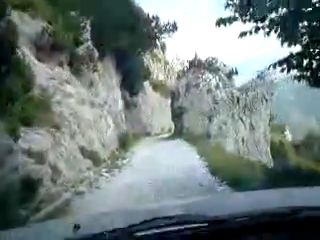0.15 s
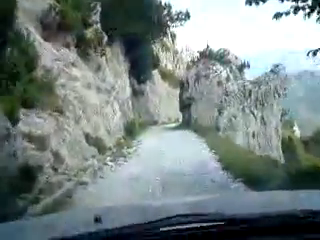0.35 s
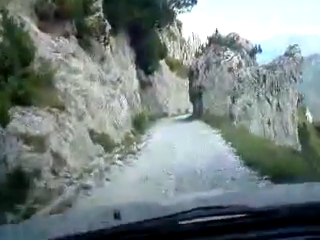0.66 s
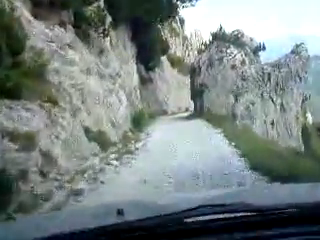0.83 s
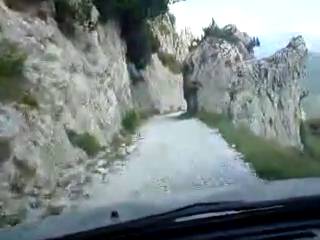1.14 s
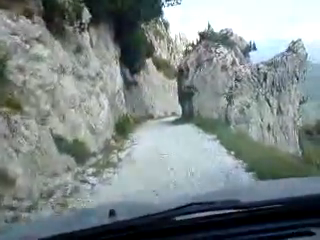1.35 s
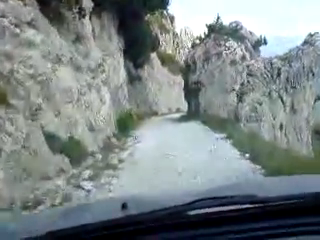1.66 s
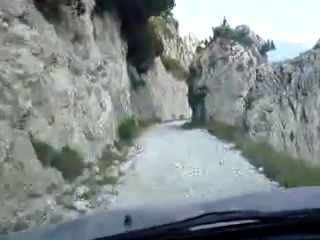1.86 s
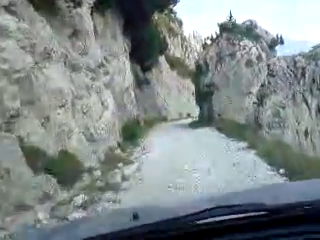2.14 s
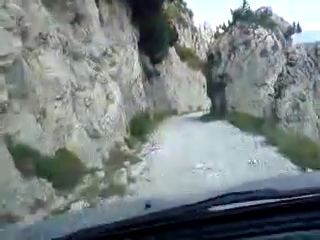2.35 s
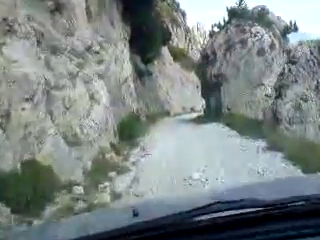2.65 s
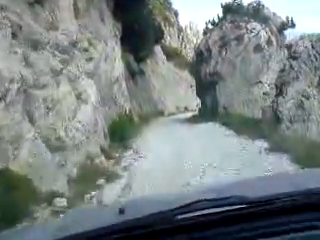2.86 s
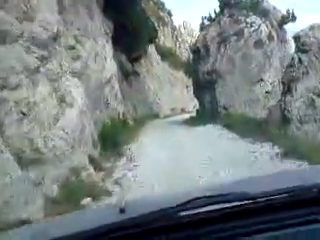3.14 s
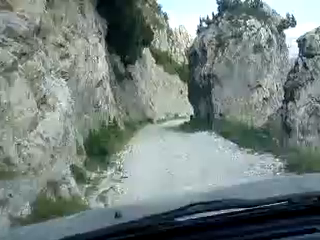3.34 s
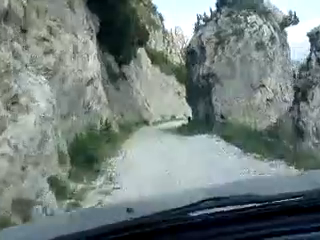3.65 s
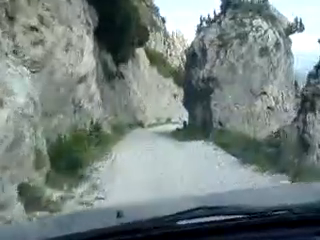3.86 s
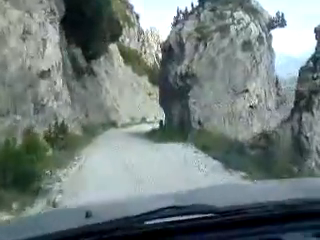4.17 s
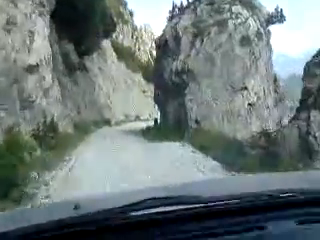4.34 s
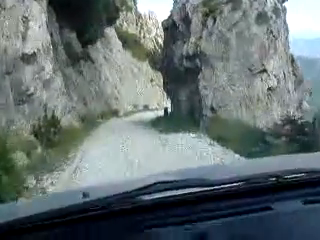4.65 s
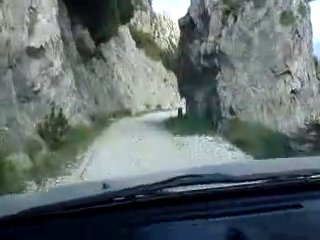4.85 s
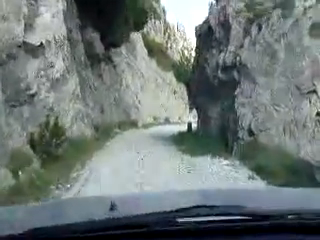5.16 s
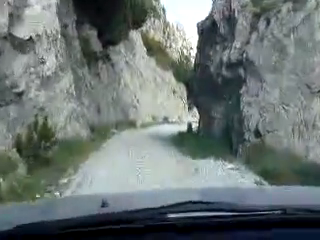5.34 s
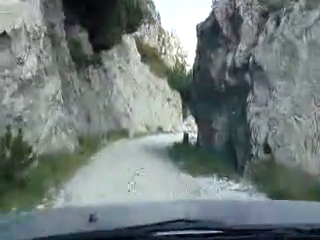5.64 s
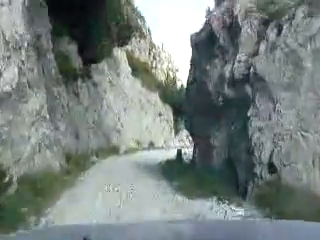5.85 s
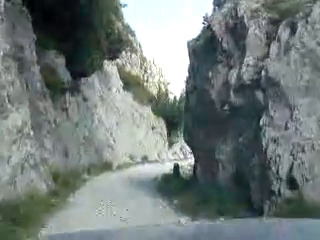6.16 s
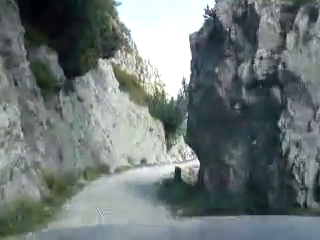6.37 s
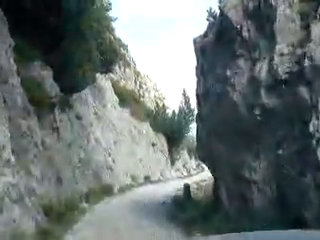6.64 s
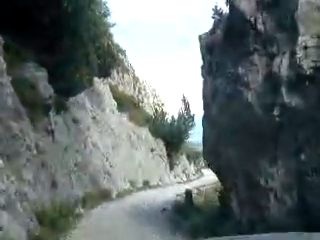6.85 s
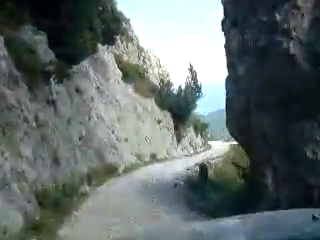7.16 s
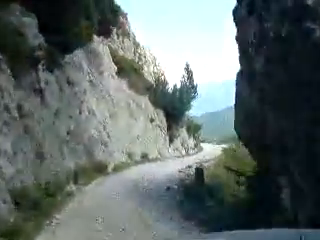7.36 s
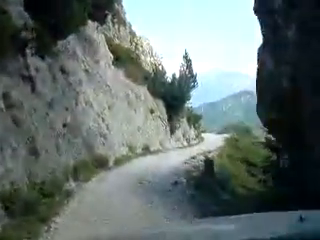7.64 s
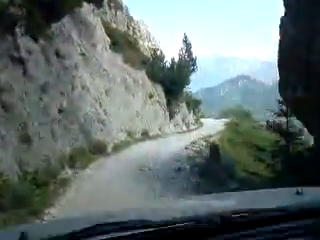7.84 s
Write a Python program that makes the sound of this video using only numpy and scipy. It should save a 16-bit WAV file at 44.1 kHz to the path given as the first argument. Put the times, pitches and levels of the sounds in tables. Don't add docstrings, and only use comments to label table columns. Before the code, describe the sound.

Low, boomy car cabin on a rough stony road: steady engine hum, grinding gravel, dull stone knocks, soft suspension thumps and small trim ticks.

```python
import sys
import numpy as np
from scipy import signal
from scipy.fft import rfft, irfft, next_fast_len
from scipy.io import wavfile
from scipy.ndimage import uniform_filter1d, map_coordinates

SR = 44100
rng = np.random.default_rng(int(sys.argv[2]) if len(sys.argv) > 2 else 0)


def transcribe(signal):
    frames = np.atleast_2d(signal).T
    limited = np.clip(frames, -1, 1)
    pcm = np.round(limited * 32767).astype(np.int16)
    wavfile.write(sys.argv[1], SR, pcm)


def level_to_linear(level):
    exponent = np.asarray(level, float) / 20
    return 10 ** exponent


N = 352800

# (time [s], looseness [dB])
LOOSENESS = [(0.0, 2), (0.4, 0), (0.96, 1.5), (1.3, 0), (2.16, -0.5), (2.76, 1), (3.03, 0), (3.76, -0.5),
             (4.17, 3), (4.4, -2), (4.8, 1.1), (5.12, 5), (5.7, 2), (6.6, 0.6), (6.9, 3), (7.35, 4.5),
             (7.72, 5), (8.0, 3.5)]
# (time [s], jolt [dB], length [s])
WHEEL_JOLTS = [(0.01, 14, 0.017), (0.23, 4.5, 0.14), (0.49, 2, 0.39), (1.11, 6.5, 0.096), (1.49, 3.5, 0.17),
               (1.7, 2.5, 0.29), (2.0, -2, 0.073), (2.77, 5, 0.13), (2.94, 1, 0.11), (3.08, 1, 0.16),
               (3.25, 3, 0.16), (3.55, 0.5, 0.26), (3.83, 3.5, 0.092), (4.02, 5, 0.11), (4.34, 11, 0.061),
               (4.84, 1.5, 0.14), (5.17, 2.5, .15), (5.44, 2, 0.39), (5.6, 2.5, 0.19), (6.04, 2, 0.5),
               (6.66, 2, 0.066), (7.1, -5, .1), (7.27, 2.5, 0.1), (7.48, 8, 0.15), (7.59, 7, 0.12),
               (7.8, 1, 0.1), (7.93, 4, 0.12)]


def unit(x):
    return x / np.sqrt(np.mean(x ** 2) + 1e-20)


def curves(rows):
    s, *cols = np.transpose(rows)
    return [np.interp(np.arange(N) / SR, s, c) for c in cols]


def swells(rows):
    t = np.arange(0, N + 64, 64) / SR
    humps = sum(db * np.exp(-(2 * (t - s) / length) ** 2) for s, db, length in rows)
    return np.interp(np.arange(N) / SR, t, humps)


def wobble(rate):
    knots = rng.standard_normal(int(N * rate / SR) + 4)
    return map_coordinates(knots, [np.arange(N) * rate / SR])


def coloured(x, spectrum):
    m = next_fast_len(N + 8192)
    hz, db = np.transpose(spectrum)
    log_hz = np.log(np.fft.rfftfreq(m, 1 / SR) + 1)
    gain = level_to_linear(np.interp(log_hz, np.log(hz + 1), db, left=-120, right=-120))
    return unit(irfft(rfft(x, m) * gain, m)[:N])


def gritty(patchy_db, per_s, spread_db, share):
    z = signal.stft(rng.standard_normal(N + 512), nperseg=512)[2]
    field = uniform_filter1d(rng.standard_normal(z.shape), size=6, axis=0)
    field = uniform_filter1d(field, size=6, axis=1)
    hiss = signal.istft(z * level_to_linear(patchy_db * unit(field)), nperseg=512)[1][:N]
    chance, size, sign = rng.random(N), rng.exponential(size=N), rng.standard_normal(N)
    cracks = (chance < per_s / SR) * sign * level_to_linear(spread_db * np.minimum(size, 4))
    return np.sqrt(1 - share) * unit(hiss) + np.sqrt(share) * unit(cracks)


def resonant(x, hz, q):
    y = signal.lfilter(*signal.iirpeak(hz, max(q, .3), SR), x)
    return y / np.abs(y).max()


def add(track, s, x):
    track[round(s * SR):][:len(x)] += x


def engine():
    # (time [s], firing rate [Hz], drone level [dB])
    revs = [(0.0, 46.47, -16.5), (0.4, 46.93, -17), (0.8, 46.88, -17.5), (1.2, 48.24, -18.5),
            (1.6, 50.33, -14.5), (2.1, 50.57, -16.5), (3.1, 51.15, -16), (3.7, 50.7, -17.5),
            (4.0, 49.52, -16), (4.4, 49.18, -18), (5.2, 46.73, -16.5), (5.6, 46.7, -19.5),
            (6.0, 47.5, -14.5), (6.4, 47.98, -16), (6.8, 47, -16), (7.2, 46.15, -18), (8.0, 45.28, -19)]
    # (multiple of firing rate, level under the drone [dB])
    orders = [(2, -23), (3, -36), (3.8, -32), (5, -43), (6, -50)]
    teeth = (7.6, 9.57)
    coasting = (-50, -56)
    # (time [s], swell [dB], length [s])
    gear_loads = [
        [(0.12, 7, 0.25), (0.62, 4, 0.34), (1.0, 12.5, 0.24), (1.55, 11.5, 0.25), (2.05, 6, 0.15), (2.75, 3.5, 0.075), (3.0, 7.5, 0.35), (3.4, 9.5, 0.22), (3.68, 8.5, 0.17), (4.58, 9.5, 0.35), (4.95, 6.5, .35), (5.3, 7, 0.41), (5.7, 5.5, 0.32), (6.02, 7, 0.19), (6.35, 5.5, 0.41), (6.85, 9.5, 0.36), (7.1, 5, 0.087)],
        [(0.5, 9, 0.34), (1.0, 13.5, 0.36), (1.6, 4.5, 0.35), (2.65, 10.5, 0.22), (3.0, 8, .2), (3.2, 8.5, .1), (3.42, 12, 0.12), (3.9, 10, 0.32), (4.85, 10.5, 0.23), (5.3, 14, .2), (5.75, 14, 0.37), (6.03, 10, 0.13), (6.3, 15.5, 0.16), (6.85, 6, .12), (7.3, 13, 0.15)],
    ]

    hz, drone_db = curves(revs)
    turn = 2 * np.pi * np.cumsum(hz) / SR
    drone = np.sin(turn - 1.3)
    for k, db in orders:
        drone += level_to_linear(db + 4.4 * wobble(5.1)) * np.sin(k * turn + k)
    whine = np.zeros(N)
    for k, db, rows in zip(teeth, coasting, gear_loads):
        whine_db = db + swells(rows) + 0.87 * wobble(18)
        whine += level_to_linear(whine_db) * np.sin(k * turn + 1.1 * wobble(15))
    unsteady_db = 1.22 * wobble(8) + 1.6 * wobble(25)
    return np.sqrt(2) * (level_to_linear(drone_db + unsteady_db) * drone + whine)


def road():
    # (time [s], swell [dB], length [s])
    heaves = [(0.11, 11.5, 0.14), (0.33, 12, 0.25), (.55, 5.5, 0.22), (.9, 3.5, .3), (1.2, 13.5, 0.19),
              (1.42, 5, 0.18), (1.85, 4.5, 0.18), (2.15, 12.5, 0.35), (2.45, 3.5, 0.18), (2.7, 3, .2),
              (3.05, 6.5, 0.25), (3.35, 13, 0.33), (3.62, 9, 0.17), (3.85, 11, 0.12), (4.02, 13.5, 0.15),
              (4.35, -8, .1), (4.52, 8.5, 0.15), (4.9, 7, 0.15), (5.1, 5, 0.13), (5.3, 9.5, 0.24),
              (5.5, 9.5, 0.24), (5.75, 9, 0.18), (6.0, 7, .15), (6.25, 9, 0.33), (6.45, 6.5, 0.19),
              (6.72, 10, 0.1), (7.0, 13.5, 0.38), (7.43, 10, 0.11), (7.58, 15, 0.14), (7.93, 12, 0.12)]
    # (frequency [Hz], density [dB per Hz])
    boom_spectrum = [(4, -29), (14, -19.5), (24, -2), (38, -1.5), (56, -1), (63, -7.5), (80, -6.5),
                     (140, -58)]
    # (frequency [Hz], density [dB per Hz])
    roar_spectrum = [(53, -29.5), (90, -8), (97, -4), (225, -17.5), (311, -19), (360, -21.5), (411, -22),
                     (520, -29.5), (680, -57), (1140, -120)]

    heave_db = swells(heaves)
    boom = level_to_linear(-26 + 0.27 * heave_db) * coloured(rng.standard_normal(N), boom_spectrum)
    shell_hz, wander_rad = 25.9, 1.5
    shell_phase = 2 * np.pi * shell_hz * np.arange(N) / SR + wander_rad * wobble(7.6)
    shell = np.sqrt(2) * level_to_linear(-30 + heave_db) * np.sin(shell_phase)
    roar_db = -36 + 0.4 * curves(LOOSENESS)[0] + swells(WHEEL_JOLTS)
    lumps = level_to_linear(0.34 * wobble(20))
    roar = unit(lumps * coloured(gritty(0.98, 300, 2.1, 0.092), roar_spectrum))
    return boom + shell + level_to_linear(roar_db) * roar


def gravel():
    # (frequency [Hz], density [dB per Hz])
    pan_spectrum = [(240, -30), (400, -1.5), (456, -5), (648, -1.5), (719, -6.5), (842, -3), (1040, -11),
                    (1400, -18.5), (1820, -45.5), (3080, -120)]
    # (frequency [Hz], density [dB per Hz])
    crunch_spectrum = [(650, -15.5), (1100, -2), (1370, 0), (1580, -1), (2030, 0), (2200, -2.5), (3090, -9),
                       (3800, -19.5), (4940, -38), (8360, -120)]
    # (frequency [Hz], density [dB per Hz])
    grit_spectrum = [(1880, -25.5), (3200, -4), (3800, -1.5), (5150, -6), (6630, -11.5), (6980, -16),
                     (7300, -23.5), (9490, -57), (16100, -120)]

    loose_db, jolt_db = curves(LOOSENESS)[0], swells(WHEEL_JOLTS)
    bite = wobble(24)
    pan_db = -46.5 + loose_db + 0.46 * jolt_db + 1.6 * bite
    crunch_db = -47.5 + 0.78 * loose_db + 0.11 * jolt_db + 1.1 * bite
    grit_db = -54.5 + 1.2 * loose_db + 0.11 * jolt_db + 0.9 * bite
    pan = level_to_linear(pan_db) * coloured(gritty(2.6, 350, 3.5, 0.23), pan_spectrum)
    crunch = level_to_linear(crunch_db) * coloured(gritty(1.8, 700, 3.5, 0.14), crunch_spectrum)
    grit = level_to_linear(grit_db) * coloured(gritty(2.4, 900, 1.7, 0.13), grit_spectrum)
    return pan + crunch + grit


def ticks():
    # (time [s], peak level [dB], ring [Hz], dull part [dB])
    trim = [(0.0392, -21.5, 3600, -13.5), (0.0473, -27, 2400, -23.5), (0.0497, -23, 5900, -5),
            (.052, -26, 3040, -15), (0.059, -30, 3600, -20), (.07, -30, 5000, -15),
            (0.083, -26.5, 4500, -4), (0.086, -21.5, 6100, -20), (.089, -31, 6300, -10),
            (0.1473, -30, 2520, -4), (0.151, -27.5, 2500, -7), (0.8637, -27, 4440, -7),
            (2.1358, -30.5, 3306, -10), (2.1718, -30, 3380, -15), (2.5998, -30, 4780, -12),
            (2.6908, -36, 5150, -12.5), (3.222, -25, 4760, -19), (3.2338, -35, 2420, -24),
            (3.2374, -27, 2804, -4), (3.333, -33.5, 2920, -8), (5.2408, -32, 3800, -13.5),
            (5.808, -43, 2467, 2), (7.2957, -23, 5630, -27), (7.7478, -27, 3380, -31),
            (7.992, -33, 2300, -8)]
    # (time [s], peak level [dB], ring [Hz], dull part [dB])
    crackle = [(0.672, -24, 1700, -1), (0.6738, -19.5, 6000, -8), (0.6743, -22, 3800, -3),
               (0.676, -25, 2000, 0), (0.68, -27, 2480, -2), (.682, -25, 2300, -3), (0.6833, -10, 5800, -8),
               (.6855, -26, 2300, -3), (0.6882, -12, 2690, -12), (0.6898, -12, 4500, -6),
               (0.692, -19, 2937, -7), (0.6933, -1, 2370, -7), (0.6958, -15.5, 1800, -6),
               (.696, -12, 5470, -9), (0.698, -24, 2600, -10), (.6995, -28, 3000, -6),
               (0.703, -25, 3400, -7), (0.705, -32, 2500, -5), (0.7096, -24, 2370, -5),
               (0.7105, -21.5, 4050, -12), (.712, -28, 2500, -7), (3.2675, -18.5, 6250, 1),
               (3.269, -22, 1810, -6)]

    out, t = np.zeros(N + SR), np.arange(SR // 20) / SR
    for rows, t60 in [(trim, 0.018), (crackle, 0.01)]:
        for s, db, hz, dull_db in rows:
            step = 3.5 * np.exp(-t / .00005)
            snap = level_to_linear(-60 * t / t60) * rng.standard_normal(len(t)) - step
            bright = resonant(snap, hz, 3.3) + 0.25 * resonant(snap, hz=6000, q=0.28)
            dull = level_to_linear(dull_db) * resonant(snap, hz=1680, q=0.53)
            add(out, s + 0.00043, level_to_linear(db - 2.5) * (bright + dull))
    return out[:N]


def knocks():
    # (time [s], peak level [dB], ring [Hz])
    stones = [(.178, -33, 523), (.796, -37, 673), (1.456, -32.5, 605), (1.688, -33, 795), (2.733, -31, 480),
              (3.185, -29, 550), (3.232, -32, 800), (3.49, -33, 750), (4.086, -35, 1044),
              (4.503, -35.5, 680), (5.106, -35, 703), (5.395, -31.5, 480), (5.659, -28, 460),
              (6.721, -28.5, 571), (6.878, -31, 612.4), (7.061, -28.5, 703), (7.098, -29, 705),
              (7.148, -40, 666), (7.451, -25.5, 850), (7.492, -27, 633), (7.51, -26, 476),
              (7.562, -22.5, 450), (7.63, -29, 710), (7.686, -34, 830), (7.717, -39, 830), (7.84, -32, 830),
              (1.144, -28.5, 640), (1.428, -27.5, 640), (1.57, -23.5, 662.6), (1.929, -26, 665.4),
              (2.327, -29.5, 810), (2.368, -29.5, 1094), (2.633, -29, 810), (2.65, -28, 800),
              (2.823, -27, 570), (3.216, -25, 700), (3.326, -27, 855.7), (3.455, -25.5, 716),
              (3.973, -28, 660.4), (4.246, -31, 810), (4.744, -27, 633), (4.834, -27, 850),
              (5.129, -27, 593.6), (5.239, -23.5, 650), (5.58, -28, 600), (5.808, -27, 649.7),
              (5.913, -26.5, 713), (6.231, -26, 610), (6.3, -27.5, 628), (6.324, -23.5, 615),
              (6.932, -27.5, 620), (7.04, -28, 567.7), (7.295, -26, 740), (7.25, -30, 350),
              (2.262, -37, 716), (2.5, -32, 778.3), (3.01, -33.5, 830.2), (7.35, -25.5, 568),
              (7.583, -23, 830), (7.914, -29, 550)]
    # (time [s], peak level [dB], ring [Hz], t60 [s])
    after = [
        (0.6938, -26, 900, 0.01),
        (4.338, -20, 326, 0.12),
        (4.342, -20, 220, 0.15),
        (4.346, -28.5, 600, 0.083),
        (6.065, -26, 500, 0.12),
    ]
    # (frequency [Hz], sharpness Q, level [dB])
    pan_modes = [(480, 8.5, 2.5), (660, 10, -6), (818, 28, -4.5)]
    # (time [s], peak level [dB], first pitch [Hz], last pitch [Hz], length [s])
    thuds = [
        (4.329, -10.5, 298, 632, 0.0142),
        (6.059, -20, 435, 555, 0.009),
    ]
    # (time [s], peak level [dB], frequency [Hz], t60 [s])
    sill_ring = (4.5, -29.5, 215, 0.23)

    out, t = np.zeros(N + SR), np.arange(SR // 4) / SR
    for s, db, hz, t60 in [(*row, 0.064) for row in stones] + after:
        fade = level_to_linear(-60 * t / t60) * (1 - np.exp(-t / 0.0011)) ** 2
        push = np.sin(2 * np.pi * hz * t) * fade / fade.max()
        rattle = resonant(resonant(fade * rng.standard_normal(len(t)), hz, 1.2), hz, 1.2)
        ring = np.zeros(len(t))
        for mode_hz, q, level_db in pan_modes:
            ring += level_to_linear(level_db) * signal.lfilter(*signal.iirpeak(mode_hz, q, SR), rattle)
        blow = 0.48 * push + 0.89 * rattle + 1.5 * ring
        add(out, s - .0015, level_to_linear(db - 1.0) * blow / np.abs(blow).max())

    for s, db, first_hz, last_hz, length in thuds:
        u = np.linspace(0, 1, round(length * SR))
        swell = np.sin(np.pi * u ** 0.71) ** 0.89
        hz = first_hz + (last_hz - first_hz) * u
        add(out, s, -level_to_linear(db) * swell * np.sin(2 * np.pi * np.cumsum(hz) / SR))

    s, db, hz, t60 = sill_ring
    t = np.arange(SR // 2) / SR
    fade = level_to_linear(db - 60 * t / t60) * (1 - np.exp(-t / 0.0072))
    add(out, s, fade * np.sin(2 * np.pi * hz * t))
    return out[:N]


def sprays():
    # (time [s], level [dB], centre [Hz], length [s])
    handfuls = [(1.117, -49.5, 4270, 0.04), (1.383, -50, 5260, .05), (0.669, -36, 3020, .046),
                (1.744, -45, 1520, 0.028), (2.322, -44, 2330, 0.043), (2.717, -38, 1630, 0.072),
                (2.805, -41, 4030, .04), (3.005, -45.5, 3428, 0.044), (3.616, -47.5, 2190, 0.068),
                (3.791, -42, 1790, 0.028), (3.997, -46, 3020, 0.025), (4.139, -50, 4430, .09),
                (4.24, -47, 4870, 0.029), (4.298, -49, 4540, 0.026), (4.476, -48, 3930, 0.038),
                (4.556, -45.5, 3020, 0.024), (5.165, -41, 1790, 0.059), (5.358, -52, 3800, .09),
                (5.893, -42, 2770, 0.033), (5.92, -45, 3660, .03), (5.974, -46, 4100, 0.022),
                (5.999, -47.5, 4770, .025), (7.409, -49, 4330, 0.08), (6.227, -45.5, 3970, 0.083),
                (6.293, -45, 3900, 0.092), (5.055, -49, 6000, 0.054), (7.219, -44, 4398, 0.035),
                (7.052, -39, 1930, 0.037), (7.57, -38, 3430, .04)]

    out = np.zeros(N + SR)
    for s, db, hz, length in handfuls:
        u = np.linspace(0, 1, round(length * SR))
        size_db = 2.3 * np.minimum(rng.exponential(size=SR // 10), 4)
        grains = rng.standard_normal(SR // 10) * level_to_linear(size_db)
        rattle = unit(resonant(resonant(grains, hz, 1.3), hz, 1.3))[:len(u)]
        add(out, s, level_to_linear(db) * np.sin(np.pi * u ** 0.54) * rattle)
    return out[:N]


def pebbles():
    # (time [s], peak level [dB],
    # ring [Hz], t60 [s])
    raps = [(1.75, -33, 1530, .05), (1.9, -33, 1900, .03), (2.722, -28, 1714, .05), (2.74, -30, 1750, .06),
            (2.755, -33.5, 1450, .05), (4.331, -27, 1390, 0.053), (4.34, -36, 1590, .05),
            (7.053, -27, 1910, .06), (7.064, -30, 1750, .05), (7.447, -30, 2612, .03),
            (7.639, -31, 1900, .04), (.6934, -7.5, 2220, 0.012)]

    out, t = np.zeros(N + SR), np.arange(SR // 10) / SR
    for s, db, hz, t60 in raps:
        fade = level_to_linear(-60 * t / t60) * (1 - np.exp(-t / 0.00036))
        chatter = resonant(resonant(fade * rng.standard_normal(len(t)), hz, 2.9), hz, 2.9)
        tap = fade * np.sin(2 * np.pi * hz * t)
        add(out, s, level_to_linear(db) * (0.55 * chatter - 0.57 * tap))
    return out[:N]


def thumps():
    # (time [s], peak level [dB], frequency [Hz])
    drops = [(1.103, -27, 150), (1.384, -31, 162), (2.317, -34, 152), (2.64, -26, 148), (2.73, -26, 154),
             (2.821, -20.5, 157), (2.933, -23, 150), (3.046, -28, 150), (3.333, -33.5, 215),
             (4.166, -33, 155), (4.87, -31, 168), (5.128, -30, 167), (5.34, -28.5, 300), (5.464, -25, 179),
             (5.554, -28.5, 150), (5.834, -32, 163), (6.058, -29, 150), (6.647, -37, 150),
             (7.249, -29, 190), (7.506, -25, 200), (7.562, -25.5, 169.3), (7.714, -32.5, 160),
             (7.799, -31, 203.2), (7.921, -38, 160)]

    out, t = np.zeros(N + SR), np.arange(SR // 4) / SR
    t60 = 0.12
    fade = level_to_linear(-60 * t / t60) * (1 - np.exp(-t / 0.0034)) ** 2
    for s, db, hz in drops:
        push = np.sin(2 * np.pi * hz * t) * fade / fade.max()
        puff = resonant(resonant(fade * rng.standard_normal(len(t)), hz, 1.5), hz, 1.5)
        blow = 0.55 * push + puff
        add(out, s - .003, level_to_linear(db) * blow / np.abs(blow).max())
    return out[:N]


def scene():
    cabin = engine() + road() + gravel()
    hits = ticks() + knocks() + sprays() + pebbles() + thumps()
    return (cabin + hits)[None]


def coarse_treble(x, low_hz, step_db, rise_db):
    hop = round(.064 * SR)
    k = np.arange(round(low_hz * 2 * hop / SR), round(8000 * 2 * hop / SR))
    n = np.arange(2 * hop) + .5
    window = np.sqrt(2 / hop) * np.sin(np.pi * n / (2 * hop))
    basis = window * np.cos(np.pi / hop * np.outer(k + .5, n + hop / 2))
    padded = np.pad(x, (hop, 2 * hop - N % hop)).reshape(-1, hop)
    parts = np.hstack([padded[:-1], padded[1:]]) @ basis.T
    uneven = np.repeat(rng.standard_normal((len(parts), len(k) // 24 + 1)), 24, axis=1)[:, :len(k)]
    step = level_to_linear(step_db + rise_db * np.linspace(0, 1, len(k)) + 3.5 * uneven)
    rounded = np.sign(parts) * np.floor(np.abs(parts) / step + 0.29) * step
    error = (rounded - parts) @ basis
    return x + (error[:-1, hop:] + error[1:, :hop]).ravel()[:N]


def top_cut(x):
    return signal.sosfilt(signal.butter(12, 9000, fs=SR, output="sos"), x)


def record(dry):
    # (frequency [Hz], level [dB])
    carriers = [(3900, -46), (7400, -77), (7800, -60), (8200, -64), (8600, -86)]

    wall = signal.ellip(12, .5, 105, 7066, fs=SR, output="sos")
    settled = signal.sosfilt_zi(wall)[:, None] * dry[0, 0]
    narrow = signal.sosfilt(wall, dry, zi=settled)[0]
    leak_band = signal.ellip(6, .5, 85, [7300, 8300], "bandpass", fs=SR, output="sos")
    leak = signal.sosfilt(leak_band, dry - dry[:, :1])
    stored = coarse_treble((narrow + level_to_linear(-21) * leak)[0], low_hz=4200, step_db=-56.5, rise_db=8)
    drone_band = signal.butter(2, [16, 90], "bandpass", fs=SR, output="sos")
    drone = signal.sosfiltfilt(drone_band, stored)
    t = np.arange(N) / SR
    mirrors = drone * sum(level_to_linear(db) * np.cos(2 * np.pi * hz * t) for hz, db in carriers)
    return top_cut((stored + mirrors)[None])


dry = scene()
out = record(dry)
transcribe(out)
```